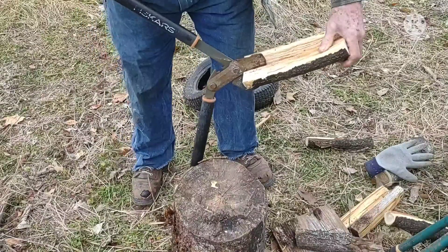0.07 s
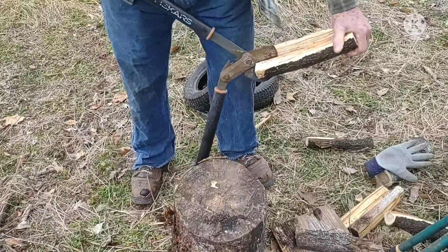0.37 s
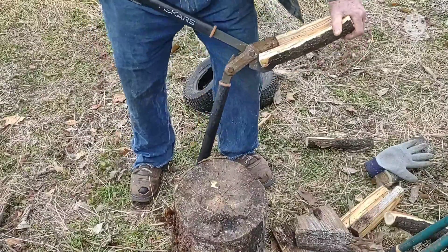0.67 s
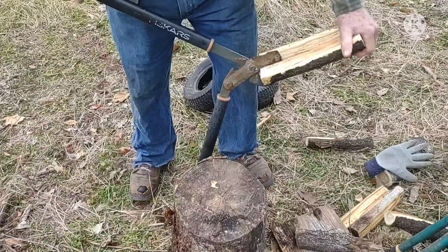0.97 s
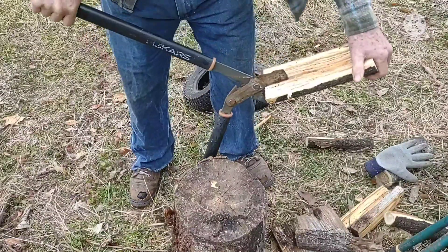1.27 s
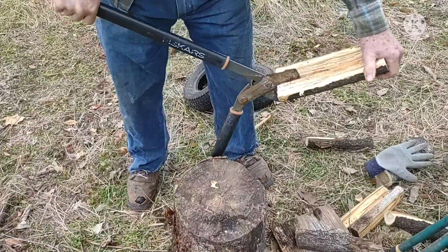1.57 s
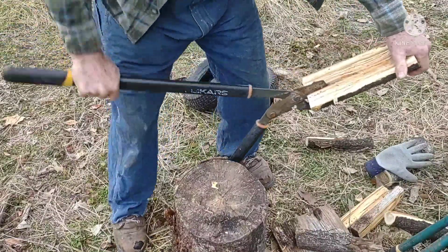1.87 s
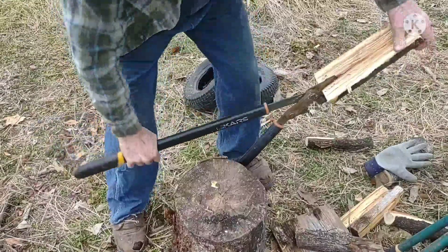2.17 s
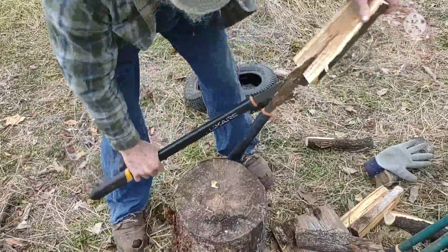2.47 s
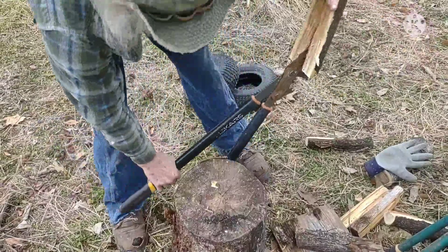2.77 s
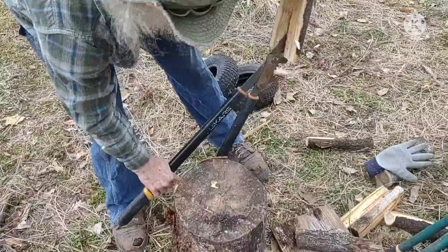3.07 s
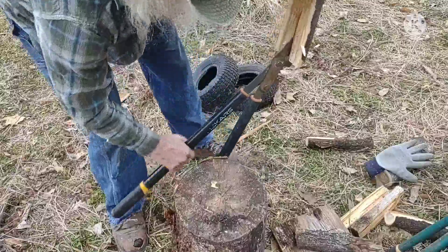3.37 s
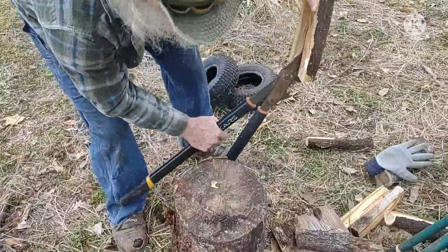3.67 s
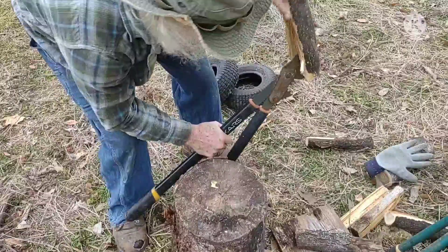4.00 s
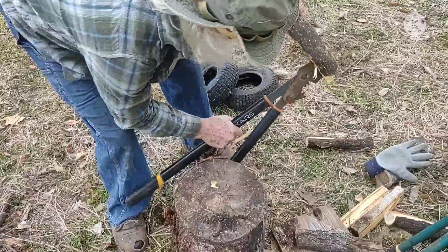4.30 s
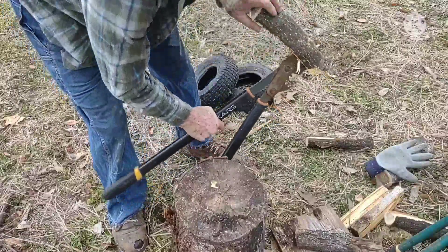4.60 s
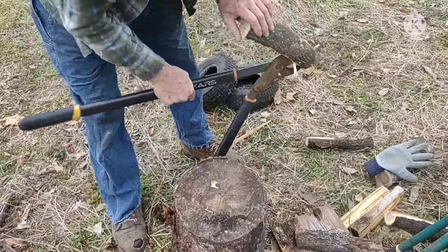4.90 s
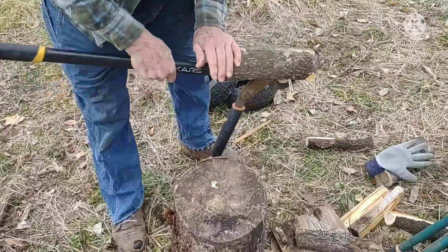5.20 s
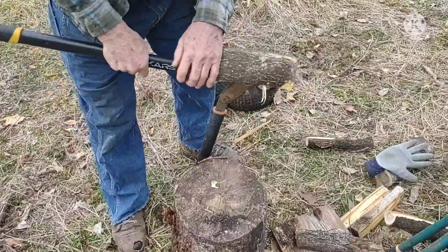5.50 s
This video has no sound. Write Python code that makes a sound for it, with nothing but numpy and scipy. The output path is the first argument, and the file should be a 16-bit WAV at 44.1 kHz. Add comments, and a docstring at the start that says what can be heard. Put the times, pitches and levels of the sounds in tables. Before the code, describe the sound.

Low wind rumbles on the microphone throughout, over the soft wash of a quiet yard. At about 0.4 seconds loppers bite into a piece of wood with a dry, hard crack, followed by faint boot scuffs on grass. The loudest crack comes at 1.6 seconds and runs on in several quick snaps. From 1.8 seconds the blade crunches through the fibres, with another sharp snap at 2.1 and a brief creak near 2.4. A soft low thump like a footfall lands at 2.5 as a gust swells. Thin splinters tick, growing fainter and sparser until about 4.2 seconds. Boots shift softly around 4.6. At 4.8 the loppers knock against the wood, rattle lightly and knock again near 5.2. The wind swells once more at the end.

```python
"""Wind rumbles on the microphone in gusts over a quiet yard. Loppers bite into a split board: it cracks
twice, the split runs on in a few snaps, and the blade crunches through the fibres. The wood creaks as the
blade slips in the cut, and splinters tick as the piece is twisted off. Boots shift on the turf, and the
tool knocks as it is opened again. Cracks and knocks ring the modes of the board and of the loppers."""
import sys
import numpy as np
from scipy import signal
from scipy.fft import rfft, irfft
from scipy.io import wavfile
from scipy.ndimage import uniform_filter1d

SR = 44100
rng = np.random.default_rng(int(sys.argv[2]) if len(sys.argv) > 2 else 0)


def generate_wav(signal):
    """Clip the signal to [-1, 1] and save it as 16-bit WAV at the path in sys.argv[1]."""
    frames = np.transpose(np.atleast_2d(signal))
    scaled = np.clip(frames, -1, 1) * 32767
    pcm = np.round(scaled).astype(np.int16)
    wavfile.write(sys.argv[1], SR, pcm)


N = 253525
TIME = np.arange(N) / SR

# spectra of the yard's wash, its far low drone and the wind's rumble: (frequency [Hz], density [dB])
WASH_SPECTRUM = [(120, -32), (200, -7.5), (273, -1), (304, -12.5), (378, -3), (584, -6), (683, -10.5),
                 (749, -9.5), (1180, -17.5), (1760, -16.5), (3660, -30), (4400, -33), (6000, -48),
                 (8200, -58), (10700, -77.5), (18000, -120)]
DRONE_SPECTRUM = [(20, -19), (35, -11), (56, -1.5), (75, -6), (110, -14), (200, -37.5), (500, -67)]
WIND_SPECTRUM = [(18, -49), (30, -23), (48, -5.5), (98, 1.5), (152, -2.5), (199, -4.5), (233, -9),
                 (280, -18.5), (310, -11.5), (411, -22), (649, -26.5), (900, -35), (1170, -60.5),
                 (1980, -120)]
# faint high whistles: (start [s], end [s], pitch [Hz], width [Hz], level [dB])
FAR_WHISTLES = [(0.928, 1.7, 4450, 130, -71.5), (0.88, 4.2, 5100, 130, -76.5)]
# gusts swell out of the breeze and die away: (peak time [s], level [dB], rise [s], fall [s])
WIND_GUSTS = [(0.33, -36, 0.24, 0.15), (1.63, -38.5, 0.15, 0.53), (2.62, -30, 0.55, 0.54),
              (3.35, -39.5, 0.38, 0.33), (5.17, -33.5, 0.42, 0.4), (5.64, -27.5, 0.7, 0.44)]
# short low thumps, like a footfall near 2.5 s, then puffs of wind: (time [s], level [dB], upper edge [Hz])
LOW_THUMPS = [(2.497, -37.5, 840), (2.518, -23, 262), (2.543, -31.5, 794), (3.395, -31.5, 222),
              (4.147, -37, 197), (5.72, -27, 205)]
# boots shift on the turf: (time [s], rise [s], level [dB], centre [Hz])
BOOT_SCUFFS = [(0.781, 0.005, -45, 656), (0.85, 0.037, -52.5, 530), (1.042, 0.0044, -46, 630),
               (4.622, 0.002, -39.5, 690), (4.663, 0.004, -44, 607), (4.84, 0.03, -46.5, 630)]
# the blade rubs in the cut: (time [s], level [dB], slip rate [1/s])
CREAK_CURVE = [(2.328, -44, 370), (2.343, -40.5, 420), (2.365, -44, 390), (2.376, -37.5, 438),
               (2.386, -45.5, 445), (2.408, -46, 520), (2.424, -55, 380)]
# resonances of the wedged board and of the steel in the cut: (pitch [Hz], width [Hz], gain [dB])
WEDGED_MODES = [(960, 110, 6), (1300, 170, -1), (1720, 150, 8), (2130, 29, 3.5), (2420, 9.5, 7)]
BLADE_MODES = [(4440, 150, 1.5), (5040, 140, 2), (6300, 320, -13)]
# spectrum of parting fibres: (frequency [Hz], density [dB])
FIBRE_SPECTRUM = [(880, -39.5), (1500, -14.5), (1780, -3), (1920, -2.5), (2330, -5.5), (2470, 0.5),
                  (3700, -2), (5170, -3), (6350, -8), (7060, -16.5), (7750, -16.5), (8200, -18.5),
                  (10700, -64.5), (18000, -120)]
# each push or twist tears fibres: (peak time [s], level [dB], rise [s], fall [s])
BLADE_PUSHES = [(0.49, -61, .04, .26), (1.85, -47, .17, .12), (1.98, -44.5, 0.1, .42),
                (2.7, -53.5, 0.25, .38), (3.41, -60.5, 0.39, 0.25), (3.86, -63.5, 0.17, 0.17),
                (4.15, -59.5, .15, .2)]
# the standout splinters: (time [s], level before gain [dB], pitch [Hz], relative edge [dB])
SPLINTER_SNAPS = [(0.6246, -52, 4760, -19), (0.678, -53.5, 4630, -21), (1.845, -39, 4150, -13),
                  (1.9626, -32, 5200, -9), (1.9705, -32.5, 4320, -11), (1.9858, -36.5, 5300, -20),
                  (2.019, -40, 5330, -19), (2.0538, -39, 5230, -16), (2.088, -24, 4400, -21.5),
                  (2.1562, -33.5, 4440, -14), (2.1855, -44, 5080, -5), (2.3175, -36, 4410, -7),
                  (2.3256, -38.5, 4570, -8), (2.417, -45.5, 5070, -11), (2.6467, -37.5, 5170, -16),
                  (2.6653, -36.5, 4950, -16), (2.6776, -43.5, 4460, -17), (2.756, -34, 4420, -21),
                  (2.8247, -38.5, 5100, -19), (2.8308, -44.5, 5050, -22), (2.8548, -43, 5220, -16),
                  (3.021, -34.5, 5640, -16), (3.2864, -39, 4700, -20), (3.516, -58.5, 7870, 6.5),
                  (3.8494, -46.5, 4700, -13), (3.983, -43, 4430, -17), (4.0899, -41.5, 4440, -13),
                  (4.127, -46.5, 5170, -3), (4.1526, -40, 6050, -27), (5.6591, -59, 4820, -9)]
# modes of the loppers and of the board: (pitch [Hz], relative level [dB], t60 [s])
LOPPER_MODES = [(370, -7.5, 0.044), (720, -8.5, .04), (1565, -2.5, 0.034), (1924, -3, 0.023),
                (2620, -5, .026), (2880, -11, 0.043), (3430, -5.5, 0.023), (3870, -6.5, 0.027),
                (4420, 3.5, 0.026), (4820, 3, 0.023), (5540, -12, 0.023), (6630, -28, .018)]
BOARD_MODES = [(505, -16, 0.023), (745, -32, 0.006), (1110, -4.5, 0.015), (1254, -14, .04),
               (1663, -9.5, 0.025), (1940, -16.5, 0.034), (2120, -21, 0.02), (2743, -3.5, 0.019),
               (2894, -3.5, 0.011), (3430, -5, 0.0086), (3790, -10, 0.013), (3900, -4.5, 0.0053),
               (4520, -5.5, 0.015), (5073, -6.5, 0.021), (5770, -7.5, 0.0032), (6540, -15.5, 0.014)]
# the loppers knock against the wood, and the board cracks:
# (time [s], level before gain [dB], relative body [dB], relative edge [dB], ring length [factor])
LOPPER_KNOCKS = [(4.7785, -24, -8.5, -7, 0.98), (4.8055, -41, 4.5, -14, 1), (4.8319, -33, -7, -16, 0.53),
                 (4.8818, -42, -1.5, -18, 0.96), (4.9347, -40, -11, -11.5, 0.94),
                 (4.9781, -42, -12.5, -10, 1), (5.1552, -23.5, -0.5, -6.5, 0.9)]
BOARD_CRACKS = [(0.4485, -12.5, -11.5, -7.5, 0.56), (1.6242, -6, -10.5, -7.5, 1),
                (1.6384, -21, -5.5, -34, 0.82), (1.6853, -36, 6.5, -27, 0.99),
                (1.7061, -32.5, 6.5, -37, 0.93), (1.7251, -17.5, -5.5, -16.5, 1),
                (1.7373, -23.5, -3, -15.5, 0.98), (1.7732, -34.5, -5.5, -11, 0.66),
                (1.8047, -35.5, -5.5, -32, 0.93), (2.088, -21, -15, -2, 0.79)]
# a hit's body, middle and edge bands: (bottom [Hz], low crossover [Hz], high crossover [Hz], top [Hz])
BLOW_BANDS_HZ = (800, 2000, 4000, 8000)
SPLINTER_BANDS_HZ = (1500, 3500, 6500, 8200)


def amp(db):
    """Gain of a level in dB."""
    return 10 ** (np.asarray(db) / 20)


def unit_rms(x):
    """Scales x to an rms of 1."""
    return x / np.sqrt(np.mean(x ** 2) + 1e-20)


def loudest(x):
    """The rms of the strongest two milliseconds."""
    return np.sqrt(uniform_filter1d(x ** 2, 88, mode="constant").max())


def add(mix, s, sound):
    """Mixes a sound in at second s."""
    part = mix[max(round(s * SR), 0):][:len(sound)]
    part += sound[:len(part)]


def eq(x, points):
    """Minimum-phase EQ, so attacks stay clean; points are (frequency [Hz], gain [dB])."""
    hz, db = np.transpose(points)
    bins_hz = abs(np.fft.fftfreq(8192, 1 / SR))
    log_gain = np.log(amp(np.interp(np.log(bins_hz + 1), np.log(hz + 1), db)))
    response = np.fft.ifft(np.exp(np.conj(signal.hilbert(log_gain)))).real
    return signal.fftconvolve(x, response[:len(response) // 2])[:len(x)]


def band(x, lo_hz, hi_hz, order=2):
    """Band-pass filter."""
    return signal.sosfilt(signal.butter(order, [lo_hz, hi_hz], "band", fs=SR, output="sos"), x)


def resonate(x, hz, width_hz):
    """One resonance at unity gain."""
    r = np.exp(-np.pi * width_hz / SR)
    return 2 * signal.lfilter([1 - r], [1, -r * np.exp(2j * np.pi * hz / SR)], x).real


def balanced(hit, edges_hz, db, body_db, edge_db):
    """Three-band EQ: sets the middle's level, and the body below and edge above relative to it."""
    bands = list(zip(edges_hz, edges_hz[1:]))
    body, middle, edge = (20 * np.log10(loudest(band(hit, *b, order=3))) for b in bands)
    lo, hi = bands[1]
    quarter_octave = 2 ** (1 / 4)
    hit = eq(hit, [(lo / quarter_octave, body_db - body + middle), (lo * quarter_octave, 0),
                   (hi / quarter_octave, 0), (hi * quarter_octave, edge_db - edge + middle)])
    return amp(db) * hit / loudest(band(hit, lo, hi, order=3))


def dispersed(x, travel_s):
    """High bending waves arrive first: delay falls as 1 / sqrt(Hz), and is travel_s at 1 kHz."""
    hz = np.fft.rfftfreq(len(x), 1 / SR)
    return irfft(rfft(x) * np.exp(-4j * np.pi * travel_s * np.sqrt(1000 * hz)), len(x))


def swells(rows, curve, depth_db=20):
    """Envelope of swells that add in power; a curve of 1 gives a pointed top, 2 a round one."""
    power = np.zeros(N)
    for peak, db, rise, fall in rows:
        away = np.maximum((peak - TIME) / rise, (TIME - peak) / fall)
        power += amp(db - depth_db * np.minimum(abs(away), 5) ** curve) ** 2
    return np.sqrt(power)


def yard(wash_db=-46, drone_db=-46):
    """The ambience bed: a soft distant wash, a steady low drone and two thin whistles far off."""
    out = amp(wash_db) * unit_rms(eq(rng.standard_normal(N), WASH_SPECTRUM))
    out += amp(drone_db) * unit_rms(eq(rng.standard_normal(N), DRONE_SPECTRUM))
    for start, end, hz, width, db in FAR_WHISTLES:
        noise = rng.standard_normal(round((end - start) * SR))
        whistle = resonate(resonate(noise, hz, width), hz, width)
        add(out, start, amp(db) * unit_rms(whistle) * signal.windows.tukey(len(whistle), 0.2))
    return out


def wind(breeze_db=-42.5, steadiness=0.24):
    """Lumpy low turbulence rides the gusts."""
    eddies = unit_rms(eq(rng.standard_normal(N), WIND_SPECTRUM))
    eddies /= uniform_filter1d(eddies ** 2, size=4000) ** (steadiness / 2)  # gentle compression
    return np.hypot(amp(breeze_db), swells(WIND_GUSTS, curve=1.84)) * eddies


def thumps():
    """Short, soft bursts of low noise: first like a footfall, later puffs of wind."""
    out, swell = np.zeros(N), signal.windows.hann(SR // 32)
    for s, db, edge_hz in LOW_THUMPS:
        thump = band(rng.standard_normal(len(swell)), 70, edge_hz, order=4)
        add(out, s - len(swell) / 2 / SR, amp(db) * unit_rms(thump) * swell)
    return out


def echoes(x, near_db=-15, near_t60=0.064, far_db=-27, far_t60=0.47):
    """The ground and the woodpile throw back a brief scatter, the trees a faint longer tail."""
    t = np.arange(SR // 2) / SR
    near, far = rng.standard_normal((2, len(t))) * amp(-60 * t / np.array([[near_t60], [far_t60]]))
    response = amp(near_db) * near / np.linalg.norm(near) + amp(far_db) * far / np.linalg.norm(far)
    return signal.fftconvolve(x, np.pad(response, (SR // 250, 0)))[:N]  # 4 ms pre-delay


def boots():
    """A sole presses the grass with a soft, dull rustle about an octave wide."""
    out, t = np.zeros(N), np.arange(SR // 3) / SR
    for s, rise, db, hz in BOOT_SCUFFS:
        swell = t / rise * np.exp(1 - t / rise)
        rustle = band(rng.standard_normal(len(t)), hz / np.sqrt(2), hz * np.sqrt(2))
        add(out, s, amp(db) * swell * unit_rms(rustle))
    return out


def creak(jitter=0.058):
    """Uneven slips of the blade drive the resonances of the wedged board."""
    s, db, rate = np.transpose(CREAK_CURVE)
    out, t = np.zeros(N), np.arange(s[0], s[-1], 1 / SR)
    wander = unit_rms(uniform_filter1d(rng.standard_normal(len(t)), 100))
    slip_rate = np.interp(t, s, rate) * (1 + jitter * wander)
    slips = np.diff(np.floor(np.cumsum(slip_rate) / SR), prepend=0)  # one click per slip
    ring = sum(amp(level) * resonate(slips, hz, width) for hz, width, level in WEDGED_MODES)
    add(out, s[0], amp(np.interp(t, s, db)) * unit_rms(band(ring, 750, 4400)))
    return out


def tearing(envelope, peak_per_s=1000, spread_db=1.5, thinning=0.65, rub_db=-6):
    """The crunch: fibres part thick and fast, thinning as the cut eases, over the blade's rubbing hiss."""
    density = (envelope / envelope.max()) ** thinning
    sizes = rng.choice([-1, 1], N) * amp(spread_db * np.minimum(rng.exponential(1, N), 3))
    breaks = unit_rms((rng.random(N) < density * peak_per_s / SR) * sizes)
    breaks *= np.sqrt(density.mean() / (density + 1e-9))  # equal power, sparse or dense
    drive = envelope * (breaks + amp(rub_db) * rng.standard_normal(N))
    wood = eq(drive, FIBRE_SPECTRUM)
    blade = sum(amp(db) * resonate(wood, hz, width) for hz, width, db in BLADE_MODES)
    return np.std(drive) * unit_rms(dispersed(wood + blade, travel_s=0.0026))


def small_splinter_cues(envelope, most=48, peak_per_s=30, thinning=0.2, peak_db=-41, follow=0.88):
    """Small splinters give way by chance, more often and louder the harder the fibres tear."""
    chance = rng.random(most)
    offsets_db, pitches_hz = rng.normal(0, 2, most), rng.normal(5000, 600, most)
    strain = envelope / envelope.max()
    expected_count = np.cumsum(strain ** thinning) * peak_per_s / SR
    onsets = np.searchsorted(expected_count, np.arange(most) + chance)
    return [(at / SR, peak_db + follow * 20 * np.log10(strain[at]) + offset, hz, -11)  # as SPLINTER_SNAPS
            for at, offset, hz in zip(onsets, offsets_db, pitches_hz) if at < N]


def splinters(rows, gain_db=0.5, width_hz=420, rasp_db=-3, rasp_t60=0.019, rise_s=0.0017, lead_s=0.00073):
    """A thin splinter rings for a few cycles at its own pitch, amid the rasp of its break."""
    out, t = np.zeros(N), np.arange(SR // 20) / SR
    rasp_envelope = amp(-60 * t / rasp_t60) * (1 - np.exp(-t / rise_s))
    for s, db, hz, edge_db in rows:
        ring = t * np.exp(-np.pi * width_hz * t) * np.sin(2 * np.pi * hz * t)
        rasp = eq(rng.standard_normal(len(t)) * rasp_envelope, FIBRE_SPECTRUM)
        snap = ring / loudest(ring) + amp(rasp_db) * rasp / loudest(rasp)
        body_db = min(-46.5 - db, -2)  # a stronger snap rings purer, with less body
        add(out, s - lead_s, balanced(snap, SPLINTER_BANDS_HZ, db + gain_db, body_db, edge_db))
    return out


def blows(rows, modes, snap_db, rasp_db, rasp_t60, travel_s, gain_db, lead_s):
    """A sharp snap, ringing modes and a short rasp; where the blow lands sets its body and edge."""
    out, t = np.zeros(N), np.arange(SR // 8) / SR
    snap = band(signal.unit_impulse(len(t), SR // 3000), 2000, 4600)
    for s, db, body_db, edge_db, length in rows:
        detune = 1 + 0.0022 * rng.standard_normal(len(modes))
        # neighbouring modes move in opposite senses, so the ring swells for a millisecond
        ring = sum((-1) ** k * amp(level - 60 * t / (t60 * length)) * np.sin(2 * np.pi * hz * detune[k] * t)
                   for k, (hz, level, t60) in enumerate(modes))
        rasp_envelope = amp(-60 * t / (rasp_t60 * length)) * (1 - np.exp(-t / 0.0019))
        rasp = band(rng.standard_normal(len(t)), 350, 3900) * rasp_envelope
        hit = ring / loudest(ring) + amp(snap_db) * snap / loudest(snap)
        hit += amp(rasp_db) * rasp / loudest(rasp)
        hit = dispersed(hit, travel_s)
        add(out, s - lead_s, balanced(hit, BLOW_BANDS_HZ, db + gain_db, body_db, edge_db))
    return out


def lopper_knocks():
    """The loppers knock against the wood and ring briefly as they are opened."""
    return blows(LOPPER_KNOCKS, LOPPER_MODES, snap_db=-29, rasp_db=-7.5, rasp_t60=0.026,
                 travel_s=0.003, gain_db=-6, lead_s=0.0011)


def board_cracks():
    """The hero sound: each jump of the split rings the board with a dry, hard crack."""
    return blows(BOARD_CRACKS, BOARD_MODES, snap_db=-22, rasp_db=-6.5, rasp_t60=0.0099,
                 travel_s=0.0027, gain_db=-4.5, lead_s=0.0014)


def scene():
    """The cut, the knocking tool and the boots, with their echoes, over the wind and the yard."""
    hits = board_cracks() + lopper_knocks()
    bed = wind() + thumps() + yard()
    tear_envelope = swells(BLADE_PUSHES, curve=1.6)
    foley = hits + tearing(tear_envelope) + creak() + boots()
    foley += splinters(SPLINTER_SNAPS + small_splinter_cues(tear_envelope))
    return (foley + echoes(foley) + bed)[None]


def record(dry):
    """A steep high cut at 8 kHz takes the top off the mix."""
    high_cut = signal.firwin(161, 8000, window=("kaiser", 7), fs=SR)
    return signal.oaconvolve(dry, high_cut[None], "same")


dry = scene()
out = record(dry)
generate_wav(out)
```